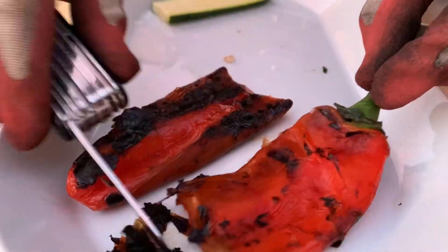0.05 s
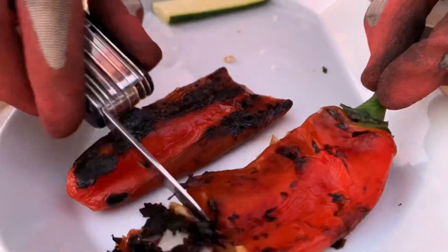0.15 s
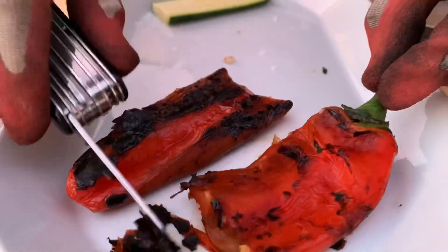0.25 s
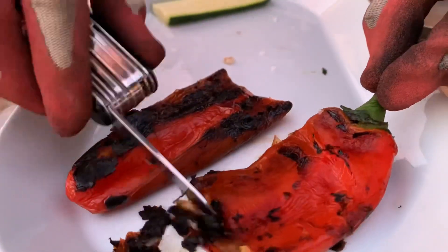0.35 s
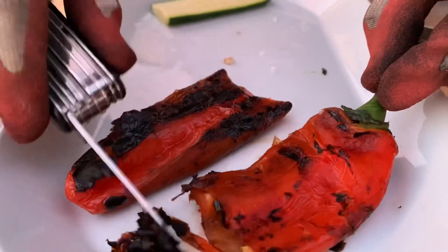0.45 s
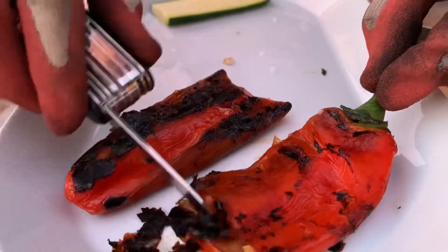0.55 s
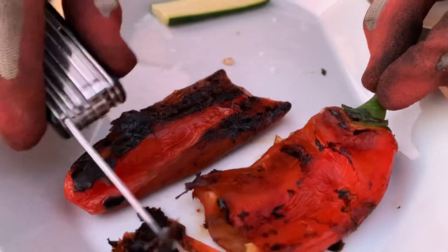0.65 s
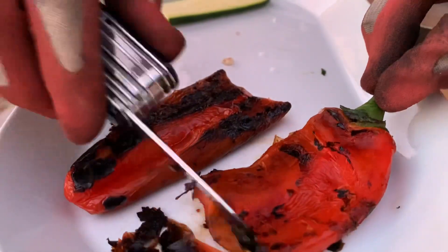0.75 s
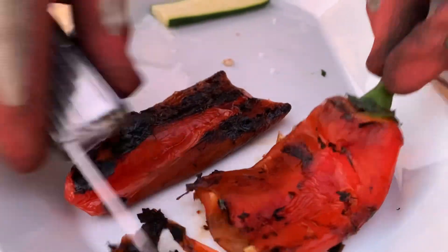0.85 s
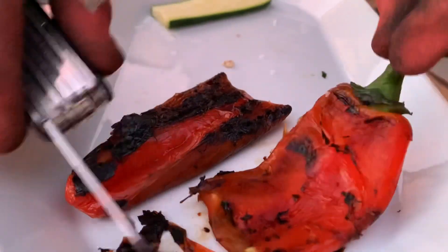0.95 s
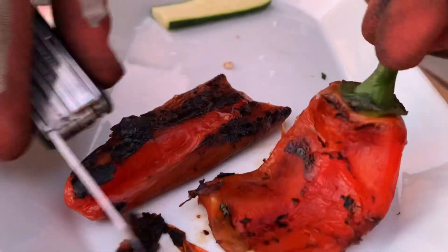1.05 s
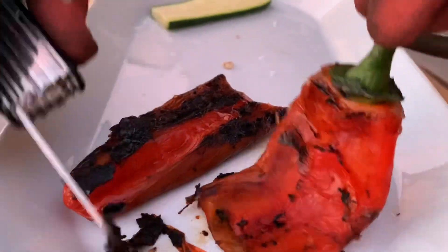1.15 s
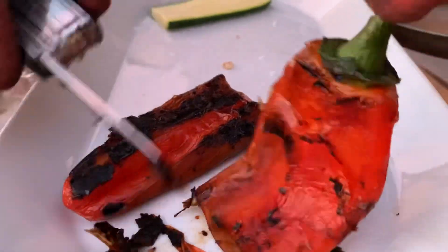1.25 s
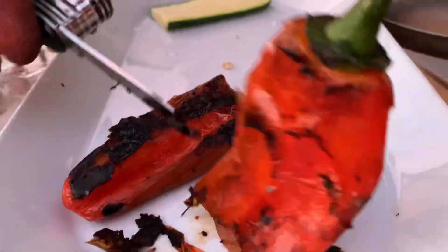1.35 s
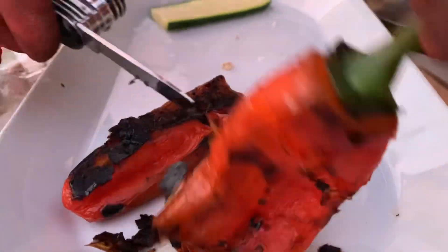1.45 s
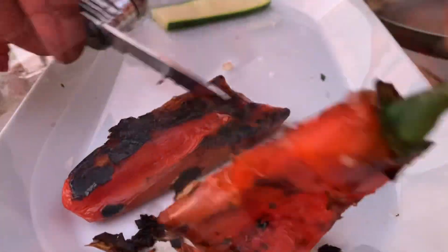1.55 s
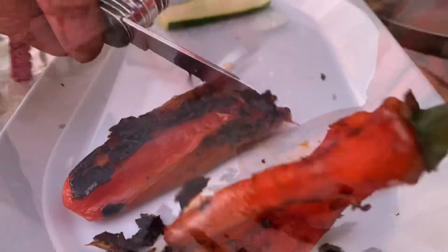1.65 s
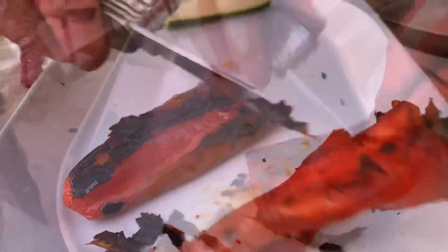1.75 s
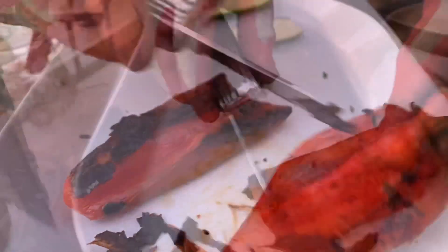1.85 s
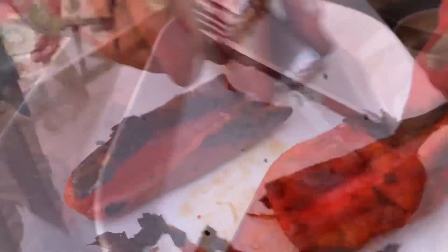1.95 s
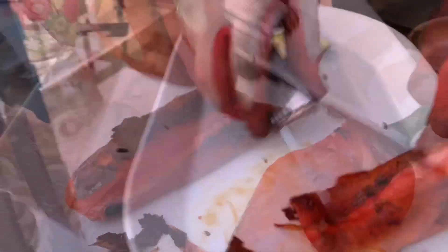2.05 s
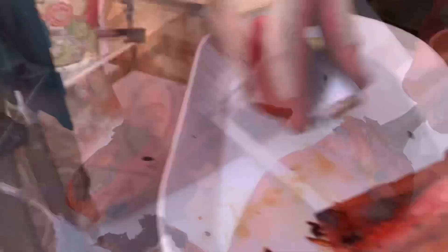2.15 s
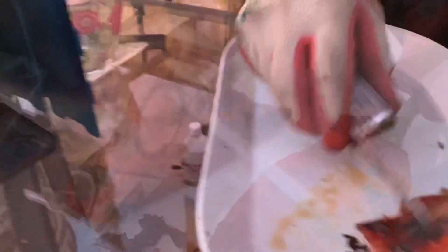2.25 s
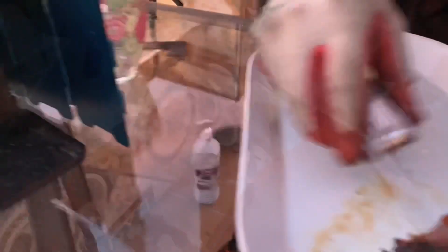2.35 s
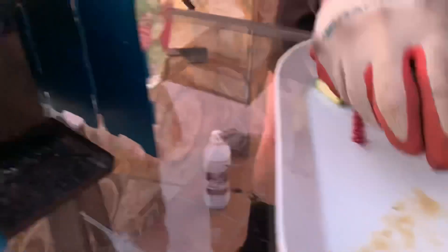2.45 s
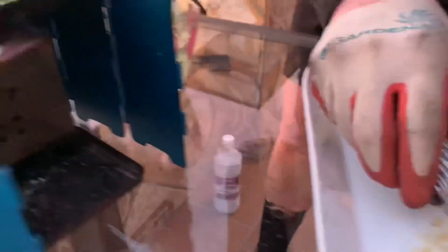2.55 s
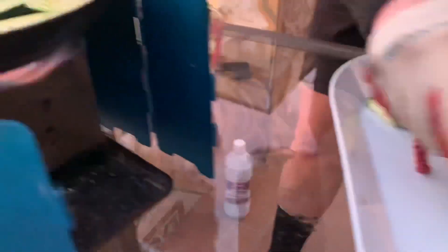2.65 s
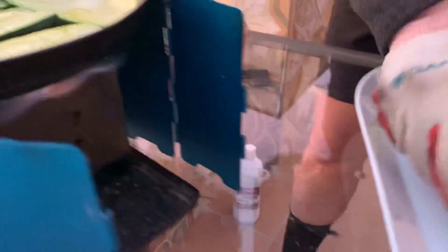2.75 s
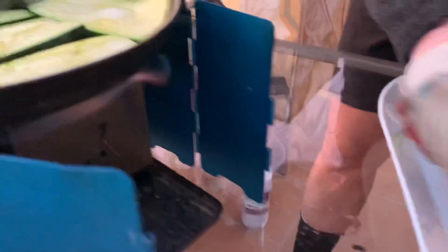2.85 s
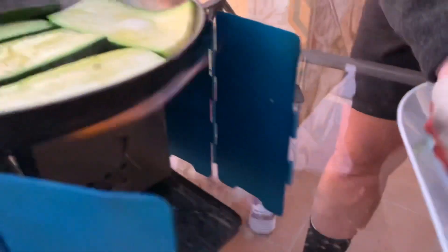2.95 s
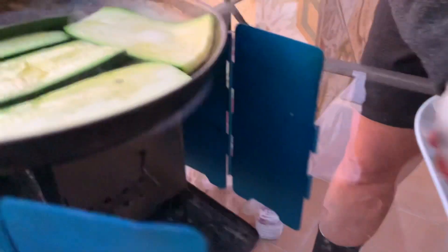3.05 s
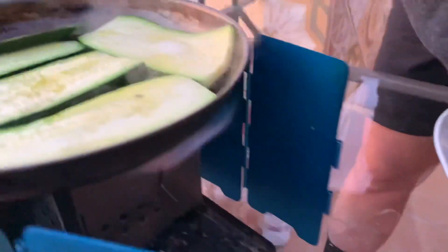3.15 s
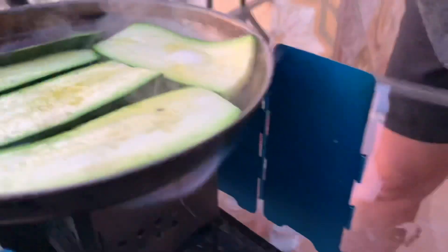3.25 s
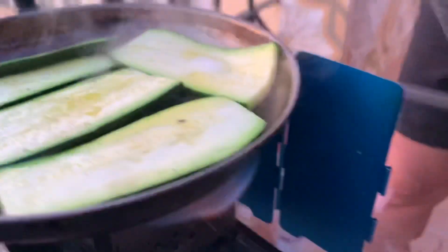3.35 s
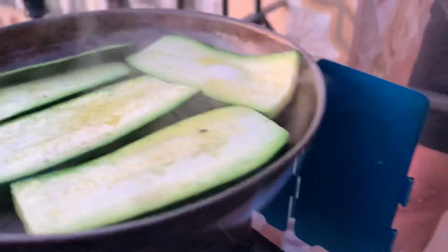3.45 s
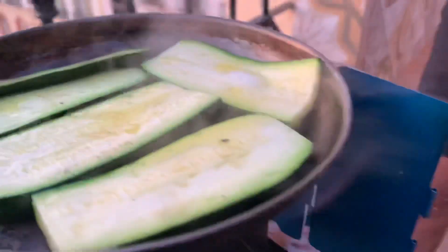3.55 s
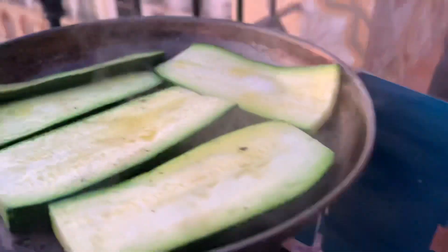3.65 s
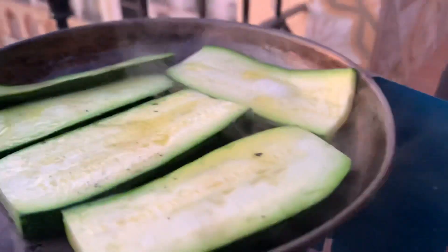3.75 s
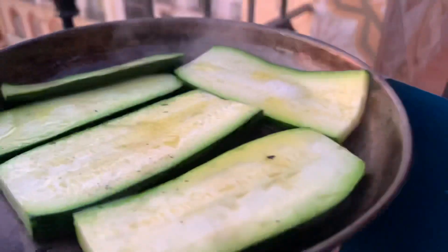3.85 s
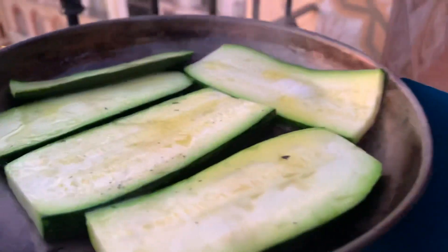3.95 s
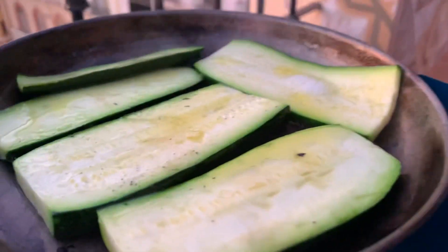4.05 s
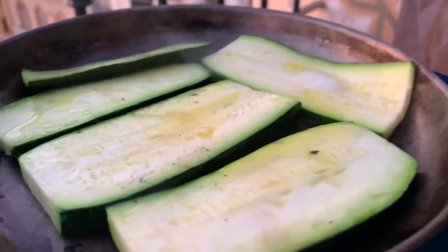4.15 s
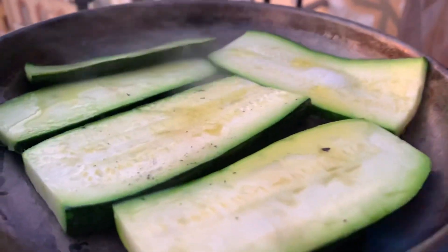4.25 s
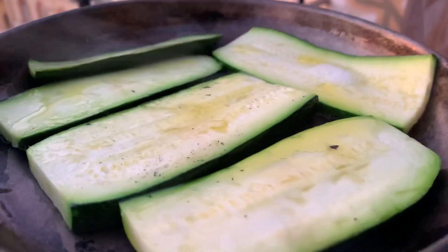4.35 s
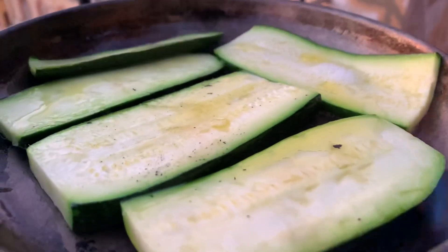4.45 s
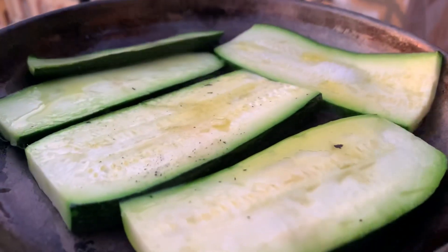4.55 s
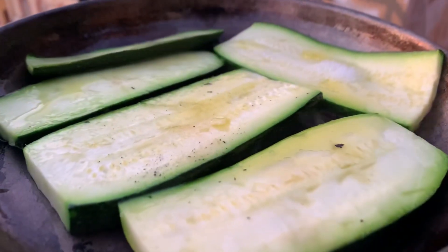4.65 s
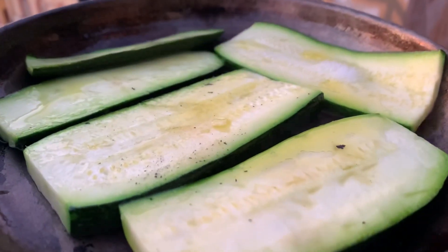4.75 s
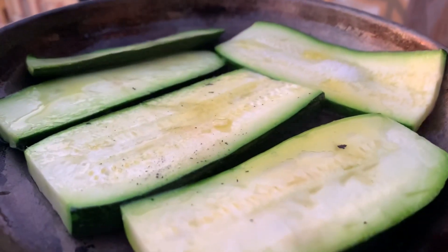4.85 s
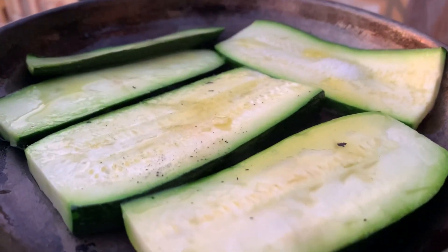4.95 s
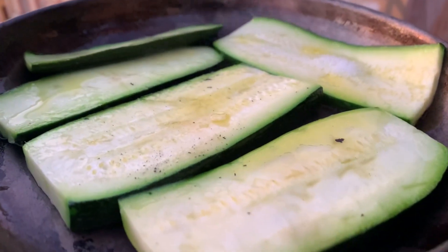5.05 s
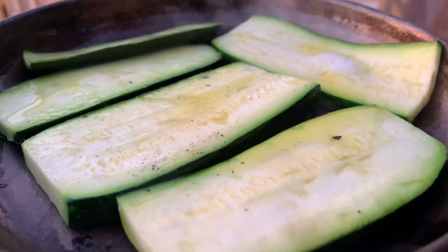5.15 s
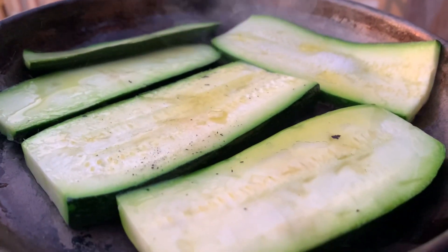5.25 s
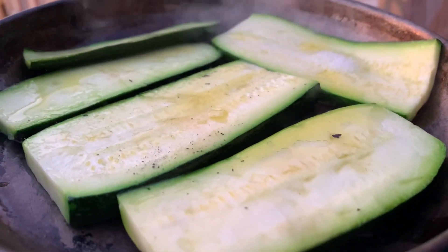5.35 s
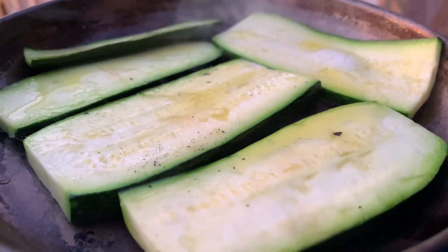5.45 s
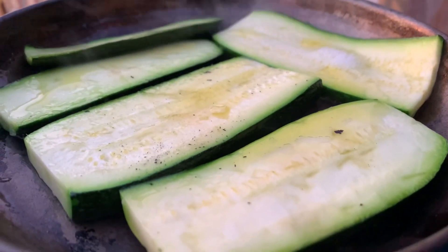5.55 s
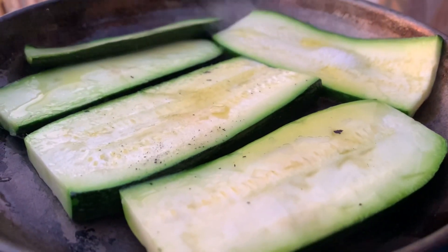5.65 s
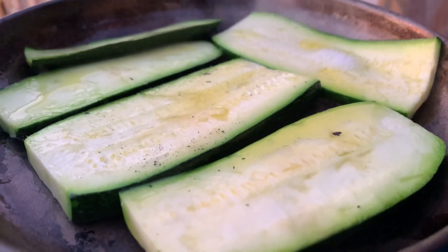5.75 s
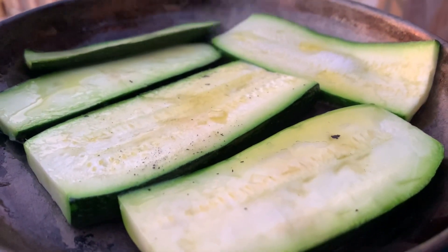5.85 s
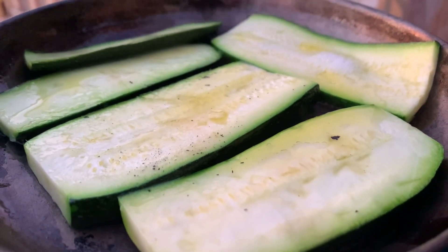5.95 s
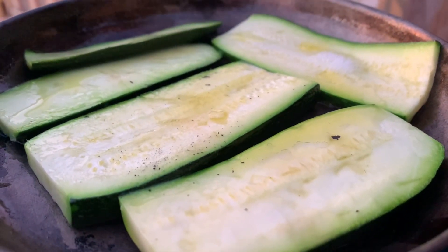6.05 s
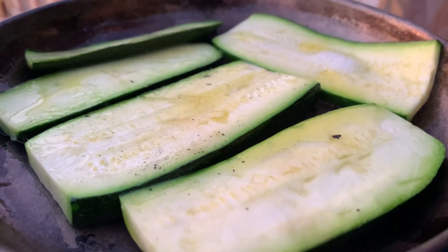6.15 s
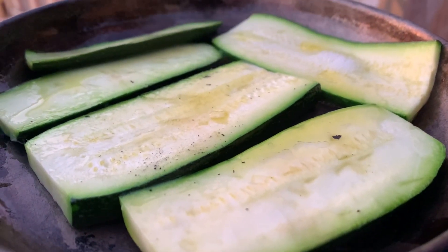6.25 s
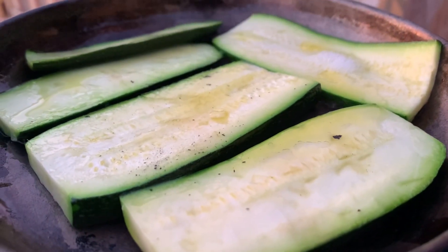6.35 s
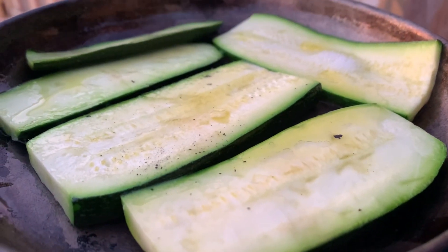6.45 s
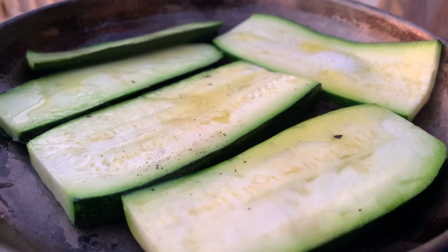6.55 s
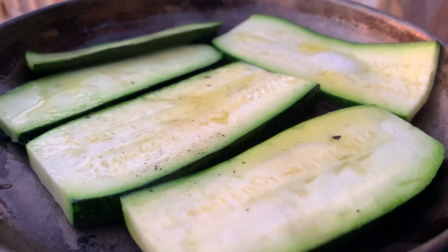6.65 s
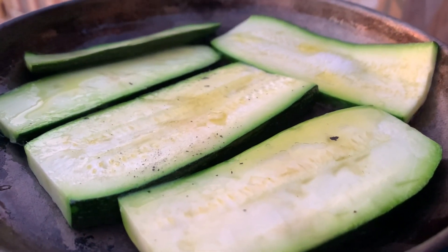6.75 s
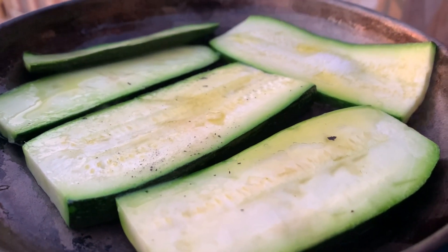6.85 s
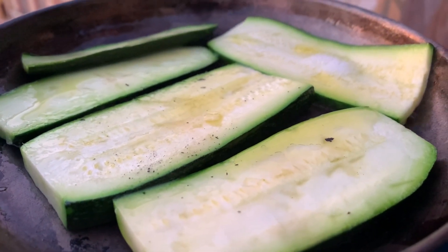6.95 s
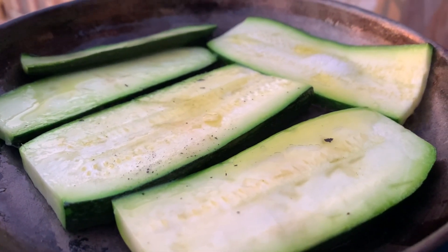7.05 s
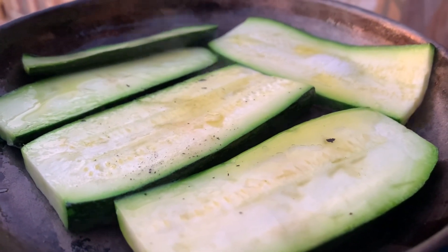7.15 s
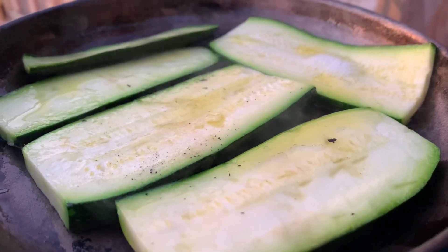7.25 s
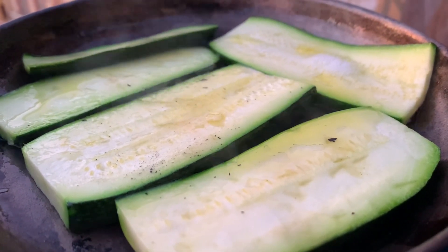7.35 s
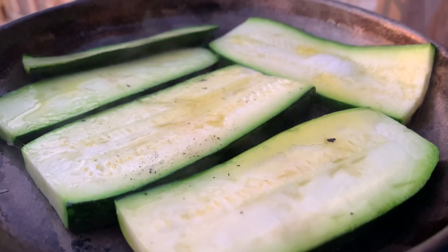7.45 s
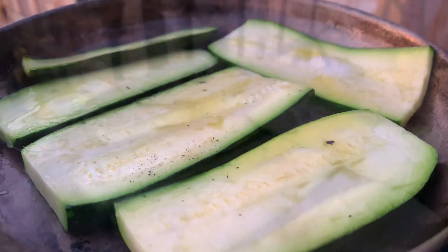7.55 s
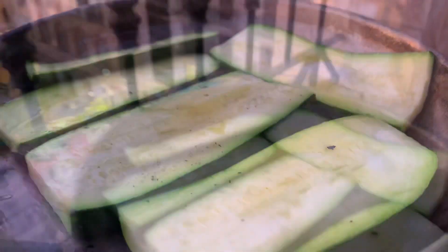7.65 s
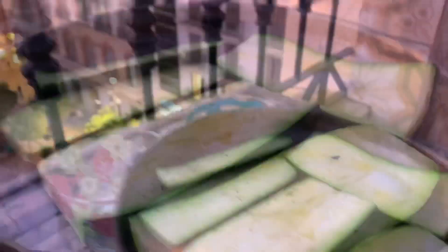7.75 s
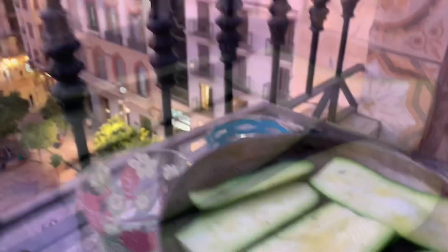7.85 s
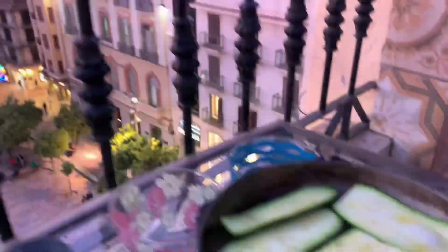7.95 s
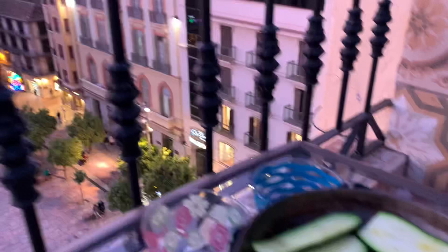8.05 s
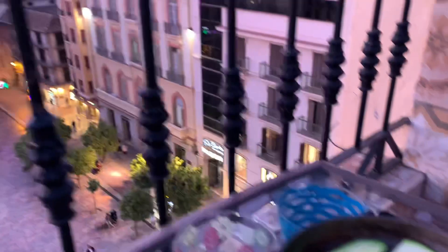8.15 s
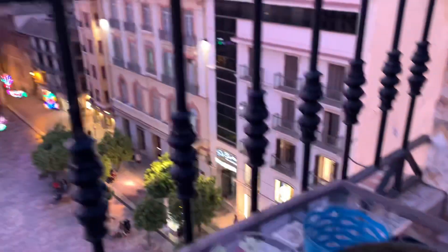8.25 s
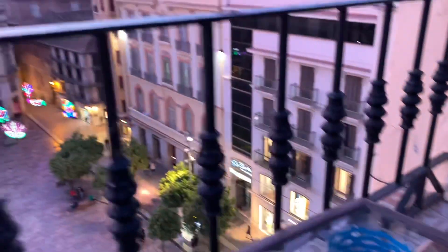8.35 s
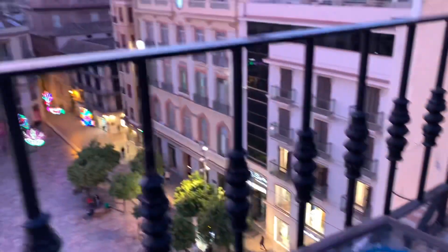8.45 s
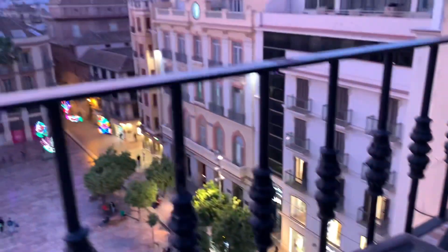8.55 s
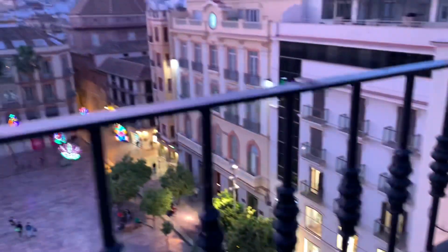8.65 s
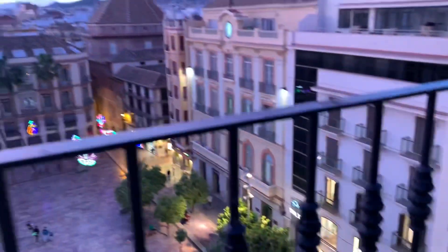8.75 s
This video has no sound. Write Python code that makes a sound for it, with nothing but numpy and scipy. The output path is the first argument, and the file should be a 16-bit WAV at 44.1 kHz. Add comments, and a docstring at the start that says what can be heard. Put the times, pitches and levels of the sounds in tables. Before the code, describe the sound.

A handheld stereo microphone on a terrace, with only a short thin reflection. From 0 to 1 s, dull plastic tray knocks alternate with crisp knife cuts at about 0.2, 0.4 and, hardest, 0.8 s, over soft, distant frying and a low burner rush. Small slips and squeaky scuffs follow from 1.7 to 2.5 s as the microphone swings away. By 2.9 s the sizzle rises quickly, with a bright spit; from 3.8 to 7.5 s it is close, a dense fine fizz with coarse crackle, sharp ticks, pops and sputters of steam, flaring near 5.3 s. Knife blows with steel ring and table thud fall at 3.0 to 3.9 s, then about every quarter second from 5.4 s, ending with a strong one at 7.4 s. After 7.7 s the microphone turns to the railing: frying softens, isolated pops remain, and a low wavering town wash rises until 8.8 s.

```python
"""Dull knocks of a plastic tray and a knife chopping roasted pepper come first, close by, over a softer sizzle.
The microphone then swings over to zucchini slices in a metal pan on a camping burner, and on to the railing of a terrace.
Frying is a crowd of short noise bursts, steam bubbles in the oil; single drops tick, spit and pop, and trapped steam sputters.
The knife excites ringing modes of blade and tray and a sinking thud of the table.
Filtered, wavering noise makes the low rush of the burner and the town below."""
import sys
import numpy as np
from scipy import signal
from scipy.fft import rfft, irfft, next_fast_len
from scipy.io import wavfile

SR = 44100
rng = np.random.default_rng(int(sys.argv[2]) if len(sys.argv) > 2 else 0)


def to_wav(sig):
    """Store sig (one row per channel, or 1-D mono) as 16-bit WAV at the path in sys.argv[1].

    Samples outside -1..1 are clipped; the rate is SR.
    """
    pcm = np.clip(np.atleast_2d(sig), -1, 1) * 32767
    pcm = np.round(pcm).astype(np.int16)
    wavfile.write(sys.argv[1], SR, pcm.T)  # frames by channels


N = 388521

# Frying as the microphone swings to the pan and on to the railing.
# Each row: time in seconds, level in dB before each layer's own trim.
PAN_LEVEL = [(0, -41.5), (1.3, -37.5), (2.35, -38), (2.9, -31.5), (3.5, -31.5), (3.85, -29.5), (4.7, -30),
             (5.9, -29.5), (7.5, -29.5), (7.8, -30.5), (8.81, -35.5)]
AT_PAN_DB = -25.5  # reference on the same scale: right above the pan


def amp(db):
    """Decibels to gain."""
    return 10 ** (np.asarray(db) / 20)


def evened(x):
    """Scales to an rms of one."""
    return x / np.sqrt(np.mean(x ** 2) + 1e-20)


def read(points, hz):
    """Reads a spectrum on a log-frequency axis."""
    f, value = np.transpose(points)
    return np.interp(np.log(hz + 1), np.log(f), value)


def follow(rows, axis):
    """One column of a curve at every sample."""
    rows = np.asarray(rows)
    return np.interp(np.arange(N) / SR, rows[:, 0], rows[:, axis])


def add(mix, s, sound):
    """Adds a two-channel sound at time s."""
    part = mix[:, max(round(s * SR), 0):][:, :sound.shape[1]]
    part += sound[:, :part.shape[1]]


def coloured(x, points):
    """Filters by a spectrum; rms one."""
    size = next_fast_len(N)
    gain = amp(read(points, np.fft.rfftfreq(size, 1 / SR)))
    return evened(irfft(rfft(x, size) * gain, size)[:, :N])


def noise_bed():
    """Steady white noise, independent in the two channels."""
    return rng.standard_normal((2, N))


def drift(slow_hz, fast_hz):
    """Random wander: sixty sines of random phase between two rates; rms one before resampling."""
    t = np.linspace(0, N / SR, 4000)
    hz = np.geomspace(slow_hz, fast_hz, 60)[:, None]
    wander = np.sin(2 * np.pi * (hz * t + rng.random(hz.shape))).sum(0)
    return np.interp(np.arange(N) / SR, t, evened(wander))


def eddying(x, low_hz, high_hz, eddy_db, count):
    """Each register of a steady noise swells and sinks on its own; rms one."""
    size = next_fast_len(N)
    whole, hz = rfft(x, size), np.fft.rfftfreq(size, 1 / SR)
    centres = np.geomspace(low_hz, high_hz, count)
    out = np.zeros((2, N))
    for band in np.eye(count):  # overlapping triangles, one per register
        register = irfft(whole * np.interp(hz, centres, band), size)[:, :N]
        out += register * amp(eddy_db * drift(3, 20))
    return evened(out)


def town(level_db=0, waver_db=1):
    """The street's wash, clearest at the railing: filtered noise that wavers in the mids."""
    # Distance of the street. Each row: time in seconds, level in dB.
    street_level = [(0, -49.5), (1.8, -50.5), (2.3, -43), (3.2, -48.5), (4, -43.5), (7.5, -53),
                    (8.1, -45.5), (8.81, -42)]
    # Colour of the wash. Each row: frequency in Hz, relative level in dB.
    street_colour = [(30, -18), (90, 2.5), (200, -14.5), (500, -4), (800, -12), (1300, -15), (2100, -12),
                     (2800, -19), (5000, -24)]
    wash = eddying(coloured(noise_bed(), street_colour), low_hz=280, high_hz=1300, eddy_db=4, count=14)
    return wash * amp(follow(street_level, axis=1) + level_db + waver_db * drift(7.5, 4.6))


def rush(level_db=2, flutter_db=0.56, eddy_db=2.5):
    """The low rush of the gas flame; it flutters as a whole, and each register wavers on its own."""
    # Gas flame at the microphone. Each row: time in seconds, level in dB before the trim level_db.
    flame_level = [(0, -40), (0.8, -41), (1.4, -41), (2.2, -46.5), (2.9, -39.5), (4.15, -39.5),
                   (4.6, -41.5), (5.2, -41.5), (5.8, -43.5), (6.8, -44), (7.35, -42.5), (7.8, -48),
                   (8.81, -47.5)]
    # Colour of the flame. Each row: frequency in Hz, relative level in dB.
    flame_colour = [(12, -48), (20, -32), (43, -11.5), (65, -1.5), (125, -5), (157, -3.5), (183, -4),
                    (333, -11.5), (428, -10), (629, -16), (840, -23), (999, -32), (1710, -22),
                    (2000, -24.5), (2600, -53), (4400, -120)]
    flame = coloured(noise_bed(), flame_colour)
    flame = eddying(flame, low_hz=60.4, high_hz=1020, eddy_db=eddy_db, count=7)
    return flame * amp(follow(flame_level, axis=1) + level_db + flutter_db * drift(2.8, 25))


def stutter(length, hz, octaves, per_s=1500, size=4096):
    """A quick run of tiny pulses swells and fades in one resonance; its energy is that of rms one over its length."""
    t, f = np.arange(size) / SR, np.fft.rfftfreq(size, 1 / SR)
    pulses = rng.standard_normal((2, size)) * (rng.random(size) < per_s / SR)
    pulses *= np.sin(np.pi * np.minimum(t / length, 1))
    resonance = np.exp(-.5 * (np.log2((f + 1) / hz) / octaves) ** 2)
    fade = np.clip(2 - t / length, 0, 1)
    return evened(irfft(rfft(pulses) * resonance) * fade) * np.sqrt(length * SR / size)


def scuffs(scuff_db=-1):
    """Knife and pepper slip briefly on the tray in runs of tiny pulses; the narrowest band is a squeak."""
    # Slips. Each row: middle in seconds, length in seconds, level in dB before scuff_db,
    # centre in Hz, width in octaves.
    slips = [(1.678, .02, -40, 6500, 0.09), (1.778, 0.015, -38, 6500, .08), (2.038, .03, -49, 1300, 0.48),
             (2.12, .025, -47, 1040, 0.18), (2.265, 0.044, -46, 1600, 0.45),
             (2.306, 0.03, -39, 4480, 0.057), (2.46, 0.013, -42, 1700, 0.55),
             (2.508, 0.014, -42, 1510, 0.45), (2.525, 0.041, -49, 1100, .4), (3.473, 0.02, -37, 1900, 0.24),
             (6.878, 0.00713, -31, 1190, 0.5)]
    out = np.zeros((2, N))
    for s, length, db, hz, octaves in slips:
        add(out, s - length / 2, amp(db + scuff_db) * stutter(length, hz, octaves))
    return out


def thud(detune=.07, spot_db=2, size=4096):
    """The table top bends under a cut: quick ripples first, then two or three slow swings; each spot differs."""
    main_hz, above_hz, settles_s = 107.5, 407, 0.0039  # starts high and sinks to the main pitch
    peak_s = .0122  # when the thud is loudest
    ripple_hz, ripple_s, ripple_db = 250, .011, -8.5  # a higher mode: pitch, decay, level
    # all three vary a little from spot to spot
    pitch, ripple_pitch, length = 1 + detune * rng.uniform(-0.94, 1, 3)
    t = np.arange(size) / SR
    angle = 2 * np.pi * np.cumsum(main_hz + above_hz * np.exp(-t / settles_s)) * pitch / SR
    age = t / (peak_s * length)
    swing = age * np.exp((1 - age ** 2) / 2) * np.array([np.sin(angle), np.cos(angle)])
    ripple = np.sin(2 * np.pi * (ripple_hz * ripple_pitch * t + rng.random((2, 1))))
    ripple *= np.sqrt(2 * t / ripple_s) * np.exp(.5 - t / ripple_s)
    return swing + amp(ripple_db + spot_db * rng.standard_normal()) * ripple


def ring(modes, rub_db, rub_s, detune=0.025, rise_s=.0008, spot_db=1.0, size=8192):
    """A blow and the brief rub after it excite modes that vary with the spot struck; unit energy."""
    t, body = np.arange(size) / SR, np.zeros((2, size))
    force = rng.standard_normal((2, size)) * np.exp(-t / rub_s)
    force *= amp(rub_db) / np.linalg.norm(force[0])
    force[:, 0] += 1  # the blow itself
    for hz, db, t60 in modes:
        turns = hz * (1 + detune * rng.uniform(-1.4, 1)) * t + rng.random((2, 1))
        mode = amp(-60 * t / t60) * np.sin(2 * np.pi * turns) * (1 - np.exp(-(t / rise_s) ** 2))
        rung = signal.fftconvolve(mode, force, axes=1)[:, :size]
        rung /= np.linalg.norm(rung, axis=1, keepdims=True)
        body += amp(db + spot_db * rng.standard_normal()) * rung
    return body / np.linalg.norm(body[0])


def crack(decay_s, tick_db=6, tick_s=0.0014, size=2048):
    """Steel snaps through charred skin: noise with a sharp tick on the tray, then a short crunch."""
    # Colour of the snap. Each row: frequency in Hz, relative level in dB.
    snap_colour = [(600, -14), (2000, -9), (4600, -5), (8000, -3), (12500, 3), (16000, 1)]
    t, f = np.arange(size) / SR, np.fft.rfftfreq(size, 1 / SR)
    noise = evened(irfft(rfft(rng.standard_normal((2, size))) * amp(read(snap_colour, f))))
    return noise * (np.exp(-t / decay_s) + amp(tick_db) * np.exp(-t / tick_s))


def clatter(favoured_hz, tilt_db, favour_db=8, reach_hz=350, chatter_s=.006, first_db=4, per_s=1200,
            detune=.008, size=4096):
    """The blade chatters on the tray for milliseconds; the point of contact decides which modes ring most."""
    # Modes of the steel blade. Each row: pitch in Hz before detuning, relative level in dB,
    # time to fall by 60 dB in seconds.
    blade_modes = [(1880, -7, .05), (2080, -14, .03), (2300, -11, .035), (2560, -7, .035), (2680, -2, .04),
                   (2850, -8, .03), (3200, -14, .02), (3650, -15, .025), (4350, -7, .04), (4750, -12, .02),
                   (4920, -7, .045), (5080, -10, .025), (5280, -13, .02), (6400, -14, .02),
                   (7420, -12, .055), (11110, -20, .025), (13200, -19, .03)]
    t, out = np.arange(size) / SR, np.zeros((2, size))
    contacts = rng.standard_normal((2, size)) * (rng.random(size) < per_s / SR) * np.exp(-t / chatter_s)
    contacts[:, 0] = amp(first_db)
    for hz, db, t60 in blade_modes:
        mode = amp(-60 * t / t60) * np.sin(2 * np.pi * hz * (1 + detune * rng.uniform(-0.2, 1)) * t)
        rung = signal.fftconvolve(contacts, mode[None], axes=1)[:, :size]
        rung /= np.linalg.norm(rung, axis=1, keepdims=True)
        place_db = favour_db * np.exp(-((hz - favoured_hz) / reach_hz) ** 2)
        place_db += tilt_db * np.clip(np.log2(hz / favoured_hz), -1, .5)
        out += amp(db + place_db) * rung
    return out


def knife(blade_db=16, crack_db=-15, tray_db=-17, table_db=0.55, knock_db=17.0, table_lag_s=0.0013,
          close_crack_db=11, close_blade_db=0, close_tray_db=12):
    """The blade cracks onto the tray and rings; tray and table answer with a knock and a slower thud."""
    # The knife meets the tray. Each row: start in seconds, force in dB, steel edge in dB (both before trims),
    # pitch favoured by the point of contact in Hz, tilt of the ring in dB per octave.
    cuts = [(0.2178, -31, -24.5, 4460, 16), (0.4286, -26, -23, 4400, 13), (0.8269, -19, -16, 4500, 14),
            (3.006, -23, -21.5, 4750, 1), (3.235, -26, -16, 5030, 5.5), (3.466, -25.5, -39, 4900, 0),
            (3.67, -25.5, -20, 5170, 26), (3.9007, -26, -17.5, 4900, 22), (5.428, -25.5, -21.5, 4900, 7),
            (5.618, -29, -29, 4630, 4), (5.8503, -23.5, -30, 4570, -5), (6.0494, -27, -20, 4350, 15),
            (6.2559, -23.5, -18, 4340, 12), (6.498, -26, -28, 4950, 9), (6.7309, -27, -27.5, 4950, -0.5),
            (6.994, -21.5, -20.5, 4900, 2), (7.1562, -28, -35, 4950, 0), (7.4258, -19, -15, 3830, 15)]
    # Dull knocks of the tray on the table. Each row: start in seconds, strength in dB before knock_db.
    knocks = [(0.045, -17.5), (.066, -28), (.22, -26), (0.235, -19.5), (0.43, -20.5), (0.616, -17),
              (.632, -33), (0.925, -16), (0.943, -33), (1.719, -33), (1.767, -32), (3.467, -21),
              (6.874, -38.5), (6.995, -34), (7.018, -23)]
    # Modes of the plastic tray. Each row: pitch in Hz and level in dB, both varied with the spot,
    # time to fall by 60 dB in seconds.
    tray_modes = [(190, -4, .04), (265, -1, .035), (330, -4, .035), (400, -3, .04), (520, 0, .04),
                  (610, -1, .04), (720, -7, .025), (830, -8, .03), (960, -6, .03), (1090, -1, .04),
                  (1220, -1, .035), (1400, -8, .02), (1580, -14, .018), (1830, -13, .018),
                  (2350, -14, .015)]
    leaves_tray_s = 2.4  # until then the microphone is close and the cuts are crisper
    # the tray rattles more than in proportion when the cut is hard
    usual_force_db, rattle_slope = -20.5, 1.3
    out = np.zeros((2, N))
    for s, force, edge, favoured_hz, tilt_db in cuts:
        close = s < leaves_tray_s
        rattle_db = tray_db + rattle_slope * (force - usual_force_db) + close * close_tray_db
        add(out, s, amp(edge + crack_db + close * close_crack_db) * crack(decay_s=0.01))
        add(out, s, amp(edge + blade_db + close * close_blade_db) * clatter(favoured_hz, tilt_db))
        add(out, s, amp(rattle_db) * ring(tray_modes, rub_db=2, rub_s=0.009))
        add(out, s + table_lag_s, amp(force + table_db) * thud())
    for s, db in knocks:
        add(out, s, amp(db + knock_db) * ring(tray_modes, rub_db=5, rub_s=.008))
    return out


def burst(hz, octaves, decay_s, echo_db=-8, echo_s=0.0031, tail_db=-21, tail_s=0.089, size=1024):
    """A bubble bursts: a brief band of noise, its echo off the pan wall, and a faint scatter."""
    t, f = np.arange(size) / SR, np.fft.rfftfreq(size, 1 / SR)
    since = t - 32 / SR  # a short lead-in before the onset
    late = since - echo_s * rng.uniform(.6, 1.4)

    def fall(u, life):
        return (u >= 0) * np.exp(-abs(u) / life)

    shape = fall(since, decay_s) + amp(echo_db) * fall(late, decay_s) + amp(tail_db) * fall(since, tail_s)
    band = np.exp(-.5 * (np.log2((f + 1) / hz) / octaves) ** 2)
    return irfft(rfft(shape * rng.standard_normal((2, size))) * band)


def split(hz, octaves, decay_s, spray_db, spray_s, count=3):
    """A drop bursts and its fragments burst just after it; unit energy."""
    out = np.zeros((2, 2048))
    add(out, 0, evened(burst(hz, octaves, decay_s, echo_db=-20, tail_db=-49, tail_s=0.0026)))
    for late in rng.uniform(.15, 1, count) * spray_s:
        add(out, late, amp(spray_db) * evened(burst(hz, octaves, decay_s)))
    return out / np.linalg.norm(out[0])


def drop(hz, octaves, usual_hz=10000, usual_s=0.00018, law=0.69):
    """One drop bursts: a small one is a short bright spit, a large one a rounder pop."""
    decay_s = usual_s * (usual_hz / hz) ** law  # bigger bubbles are lower and last longer
    return split(hz, octaves, decay_s, spray_db=-7.5, spray_s=.005)


def spurts(spurt_db=-1, octaves=0.15):
    """Trapped steam sputters out through a narrow gap under a slice, in runs of tiny pulses."""
    # Steam spurts. Each row: middle in seconds, length in seconds, level in dB before spurt_db, centre in Hz.
    jets = [(3.879, 0.019, -22.5, 5800), (4.132, 0.056, -35, 2830), (4.439, 0.026, -33.5, 3040),
            (4.942, .02, -30.5, 2650), (5.312, .018, -40, 3320), (5.514, 0.034, -31, 3060),
            (5.65, .025, -32, 3370), (5.668, 0.023, -30, 3120), (6.205, 0.024, -30, 3020)]
    out = np.zeros((2, N))
    for s, length, db, hz in jets:
        add(out, s - length / 2, amp(db + spurt_db) * stutter(length, hz, octaves))
    return out


def crackle(crackle_db=-14, spread_db=5, low_hz=2700, high_hz=7500, slope=0.74, count=420):
    """Fat crackles in small dry pops of mixed size and colour, which stand out from the hiss away from the pan."""
    out, level_db = np.zeros((2, N)), slope * (follow(PAN_LEVEL, axis=1) - AT_PAN_DB)
    for when, strength, pitch, width in rng.random((count, 4)):
        db = level_db[int(when * N)] + crackle_db + 2 * spread_db * strength ** 2
        hz = low_hz * (high_hz / low_hz) ** pitch
        add(out, when * N / SR, amp(db) * drop(hz, .2 + .5 * width))
    return out


def spatter(spit_db=16, random_db=19, spread_db=-3.0, low_hz=3500, high_hz=14500, count=25):
    """Single drops burst at set times, from faint ticks to loud spits and pops; more at random follow the frying's level."""
    # Single drops that burst in the pan, faint to loud. Each row: start in seconds,
    # strength in dB before spit_db, centre in Hz, width in octaves.
    spits = [(.7603, -24, 5660, 0.62), (1.0935, -24, 4500, 0.65), (1.2622, -28, 4850, 0.43),
             (1.3348, -28, 4320, 0.45), (1.3744, -28, 5600, .4), (1.466, -26, 4350, 0.81),
             (1.864, -28.5, 3500, .5), (2.0921, -29, 3460, 0.47), (2.4896, -31, 5300, 0.31),
             (2.936, -9, 13500, 0.58), (3.138, -17, 10100, 0.25), (3.1983, -20, 6040, 0.57),
             (3.326, -17, 12000, 1), (3.355, -19, 5500, 1.1), (3.4063, -17, 8050, 0.26),
             (3.592, -13, 8450, 0.29), (3.7268, -19, 5550, 0.27), (3.808, -7, 10000, 0.28),
             (3.873, -10, 6300, 0.73), (3.974, -11.5, 7500, 0.33), (3.9767, -14, 4550, 0.77),
             (4.051, -16.5, 5400, 0.26), (4.2193, -8.5, 6740, 0.72), (4.298, -12.5, 3700, 1),
             (4.401, -16, 4500, 1), (4.43, -9.5, 10500, 1), (4.456, -20, 5960, 1.1),
             (4.477, -13, 5500, 1.1), (4.5305, -21.5, 3870, 0.22), (4.575, -20, 5600, 0.48),
             (4.6225, -10.5, 13300, 0.56), (4.631, -22, 5200, 0.61), (4.779, -8.5, 10300, 0.79),
             (4.928, -14, 2640, 1), (5.059, -8.5, 13100, 0.86), (5.062, -10, 13000, .5),
             (5.1518, -11, 3670, 1.2), (5.1996, -17, 13400, 0.56), (5.307, -15.5, 3380, 0.38),
             (5.3156, -3, 13400, 0.33), (5.3455, -9, 13900, 0.3), (5.451, -14, 10300, 0.54),
             (5.4732, -18, 5000, 1), (5.567, -24, 4240, 0.82), (5.6713, -16.5, 3200, 1.5),
             (5.7478, -9, 13700, 1.1), (5.7892, -17.5, 3000, 0.98), (5.8348, -11, 7540, 0.4),
             (5.8428, -10, 7600, 0.55), (5.9216, -18, 3080, 0.56), (5.9842, -11, 8300, 0.25),
             (6.132, -21, 4220, 0.53), (6.2075, -14, 13500, 0.68), (6.365, -13, 10500, 0.32),
             (6.5212, -17, 3570, 0.23), (6.547, -11.5, 10300, .4), (6.574, -23, 4900, 0.6),
             (6.6948, -22.5, 3100, 0.56), (6.7756, -13, 5300, 1.1), (6.838, -9, 7900, 0.35),
             (6.8749, -14.5, 3600, 1.1), (7.1155, -10, 3950, 0.69), (7.18, -13.5, 4400, 0.87),
             (7.494, -8, 13300, 0.41), (7.5407, -28, 5100, 0.45), (7.7674, -22, 5750, 0.45),
             (7.7924, -19, 5750, 0.54), (7.9295, -15, 9550, 0.55), (8.301, -13.5, 3870, 1.5),
             (8.6536, -20, 4260, 1), (8.7174, -16, 9500, 1.2)]
    out, level_db = np.zeros((2, N)), follow(PAN_LEVEL, axis=1)
    for s, db, hz, octaves in spits:
        add(out, s, amp(db + spit_db) * drop(hz, octaves))
    for when, chance, pitch in rng.random((count, 3)):
        db = level_db[int(when * N)] + random_db + spread_db * (2 * chance - 1)
        hz = low_hz * (high_hz / low_hz) ** pitch
        add(out, when * N / SR, amp(db) * drop(hz, octaves=0.46))
    # the pan carries little of a burst below 2060 Hz
    return signal.sosfilt(signal.butter(4, 2060, "high", fs=SR, output="sos"), out)


def bubbles(per_s, low_hz, high_hz, spread_db, clump_db, octaves, decay_s, count=300):
    """A crowd of bursts, mostly tiny, whose strength comes in flurries as water seeps into the oil."""
    kinds = [evened(burst(hz, octaves, decay_s)) for hz in np.linspace(low_hz, high_hz, count)]
    size_db = spread_db * np.minimum(rng.exponential(1, N), 4) + clump_db * drift(7, 70)
    kind, out = rng.integers(0, count, N), np.zeros((2, N))
    for i in np.flatnonzero(rng.random(N) < per_s / SR):
        add(out, i / SR, amp(size_db[i]) * kinds[kind[i]])
    return evened(out)


def frying(fizz_db=2, sputter_db=-35.5, hiss_db=-5, seethe_db=-7, far_db=-44, surge_db=1.6,
           sputter_surge_db=1.25):
    """Fine fizz and coarser sputter over the hiss of escaping steam; distance smears the grains into that hiss."""
    # Colours of fizz, sputter and distant hiss. Each row: frequency in Hz, relative level in dB.
    fizz_colour = [(3000, -30), (5500, -10), (7000, -4), (7900, -1), (9000, -2.5), (11000, -2.3),
                   (13000, 0), (15000, -.3), (15700, -2.5), (16200, -14)]
    sputter_colour = [(400, -12), (900, 0), (1600, -8), (2200, -3.5), (2700, 1.5), (3200, 7), (4100, 0),
                      (4950, 0.5), (5600, -3), (6500, 8), (8000, -42), (11000, -32)]
    far_colour = [(1300, -7), (2400, 16.5), (3000, 16), (4100, 23), (4900, 8), (5400, -21), (6200, 26),
                  (7200, -9), (10000, 18), (15000, 16), (16200, -10)]
    # Juice runs into the oil and the frying flares. Each row: middle in seconds, half length in seconds,
    # fizz rise in dB, sputter rise in dB.
    flares = [(4.133, 0.091, 1, 2), (5.2, 0.053, 2, 8), (5.327, 0.23, 4.5, 3.5), (6.395, 0.022, 3, 5.5),
              (7.4, 0.072, 1.5, 3.5), (8.01, 0.018, 3, 8.5)]
    sputter_slope = 0.72  # dB of sputter per dB of fizz: the treble is lost first off the pan
    t, level_db = np.arange(N) / SR, follow(PAN_LEVEL, axis=1)
    above_db = level_db - AT_PAN_DB
    near = np.clip(1 + 0.07 * above_db, 0, 1)  # share of distinct grains, falling with the level
    fine = bubbles(per_s=1800, low_hz=5400, high_hz=15300, spread_db=4.0, clump_db=1.5,
                   octaves=0.15, decay_s=0.0004)
    coarse = bubbles(per_s=750, low_hz=1050, high_hz=8000, spread_db=2.5, clump_db=1.5,
                     octaves=0.39, decay_s=0.00021)
    flare_db = sum(np.outer(rises, np.exp(-((t - s) / half) ** 2)) for s, half, *rises in flares)
    surge = near * drift(3, 16)
    fizz = coloured(near * fine + amp(hiss_db) * noise_bed(), fizz_colour)
    sputter = coloured(near * coarse + amp(seethe_db) * noise_bed(), sputter_colour)
    diffuse = coloured(noise_bed(), far_colour) * amp(far_db + drift(1.0, 30)) * (1 - near)
    fizz *= amp(level_db + fizz_db + flare_db[0] + surge_db * surge)
    sputter *= amp(sputter_slope * above_db + sputter_db + flare_db[1] + sputter_surge_db * surge)
    return fizz + sputter + diffuse


def terrace(x, wet_db=-15, t60=0.13, size=16384):
    """Wall and floor throw back a short, thin tail: decaying noise that starts after 5 ms."""
    t = np.arange(size) / SR
    tail = rng.standard_normal((2, size)) * amp(-60 * t / t60) * (t > .005)
    return x + amp(wet_db) * signal.oaconvolve(x, tail / np.linalg.norm(tail[0]), axes=1)[:, :N]


def scene():
    """All sources at two ports that share part of the sound; the left leads in the mids until the turn
    to the railing, the right in the treble."""
    # Likeness of the two microphone ports. Each row: frequency in Hz, likeness from 0 to 1.
    likeness = [(40, .88), (140, .92), (300, .8), (600, .55), (1200, .5), (3000, .45), (5000, .3),
                (6500, .2), (7500, .55), (8500, .9), (15000, .9)]
    # Delay between the ports. Each row: frequency in Hz, samples by which the left one is late.
    left_delay = [(250, 0), (1100, -7), (2200, -18), (5819, -18), (5820, 12.3), (8600, 12.8),
                  (16000, 13.25)]
    turn_s, turn_lasts_s = 7.7, 0.23  # the microphone turns away to the railing
    ahead_below_hz = 5819  # after the turn there is no delay up to here
    events = spatter() + crackle() + spurts() + knife() + scuffs()
    size = next_fast_len(N)
    # the sources' two channels are the part common to both ports and the part that sets them apart
    shared, own = rfft(frying() + terrace(events) + rush() + town(), size)
    hz = np.fft.rfftfreq(size, 1 / SR)
    same, lag = read(likeness, hz), read(left_delay, hz)
    common, apart = shared * np.sqrt((1 + same) / 2), own * np.sqrt((1 - same) / 2)

    def left(late):
        return irfft((common + apart) * np.exp(-2j * np.pi * hz * late / SR), size)[:N]

    beside, ahead = left(lag), left(lag * (hz > ahead_below_hz))
    turned = np.clip((np.arange(N) / SR - turn_s) / turn_lasts_s, 0, 1)
    right = irfft(common - apart, size)[:N]
    return np.array([beside + turned * (ahead - beside), right])


def record(dry):
    """The recorder clips any peak beyond 0.85 and limits the band to 16 kHz."""
    lowpass = signal.firwin(401, 16000, window=("kaiser", 9), fs=SR)
    return signal.oaconvolve(np.clip(dry, -.85, .85), lowpass[None], "same", axes=1)


dry = scene()
out = record(dry)
to_wav(out)
```